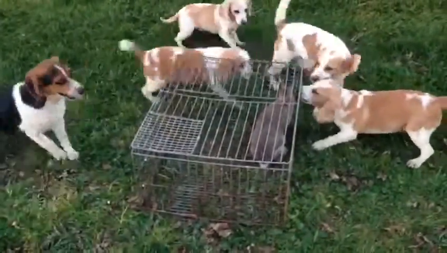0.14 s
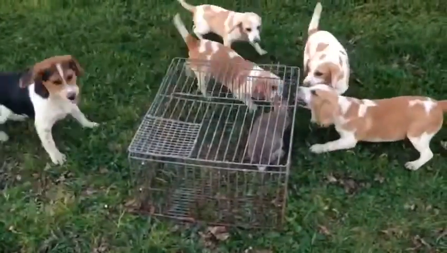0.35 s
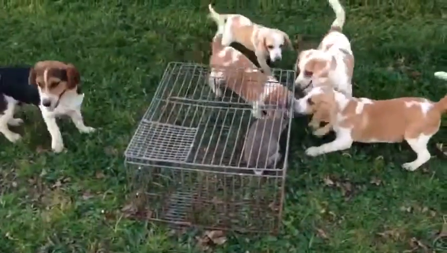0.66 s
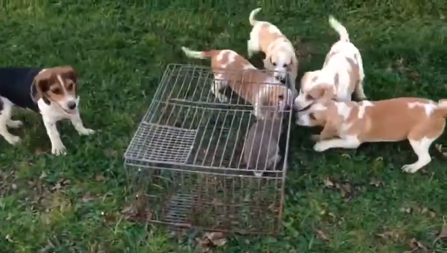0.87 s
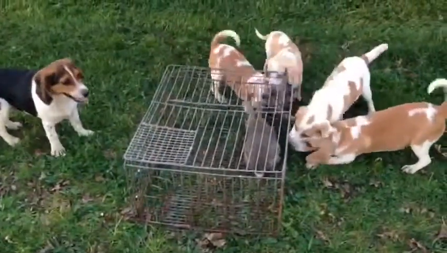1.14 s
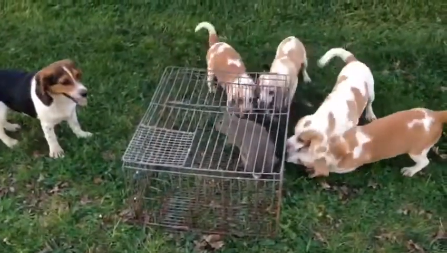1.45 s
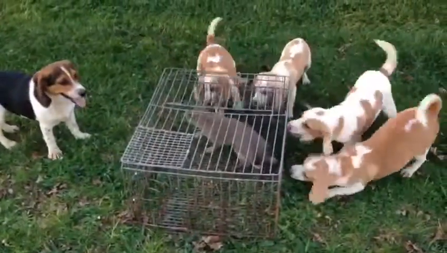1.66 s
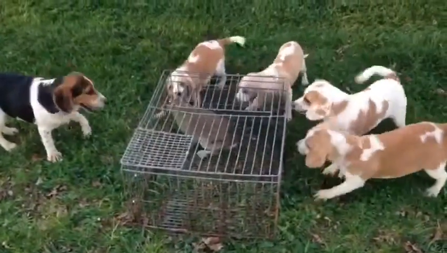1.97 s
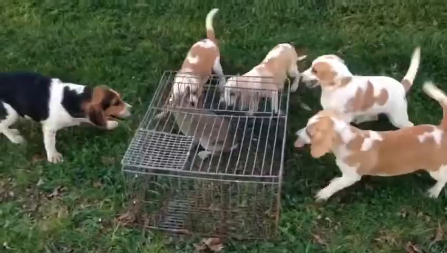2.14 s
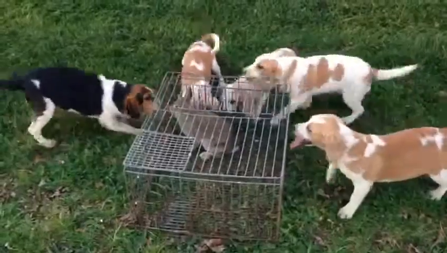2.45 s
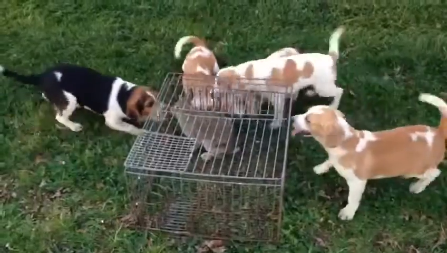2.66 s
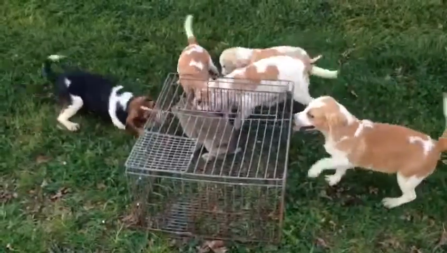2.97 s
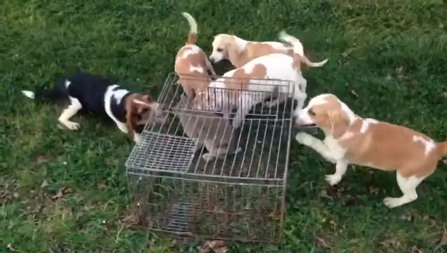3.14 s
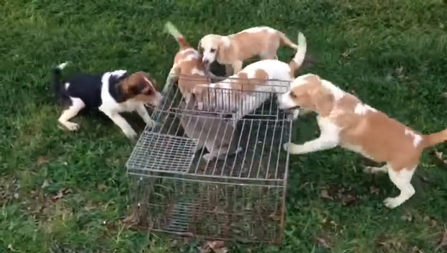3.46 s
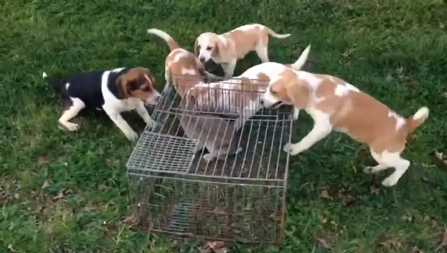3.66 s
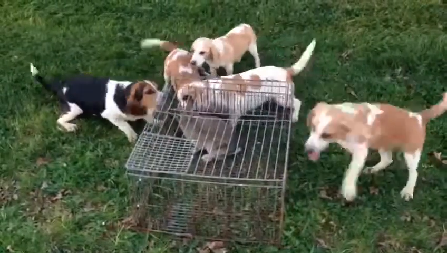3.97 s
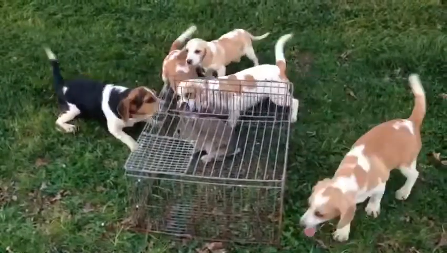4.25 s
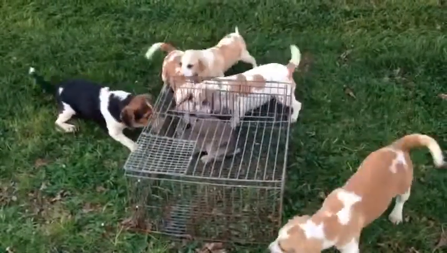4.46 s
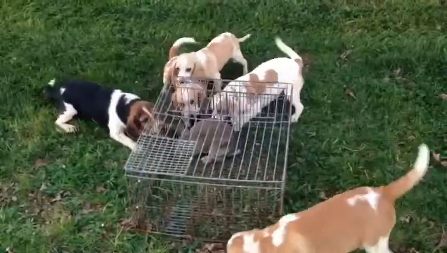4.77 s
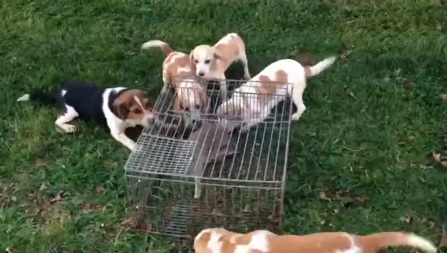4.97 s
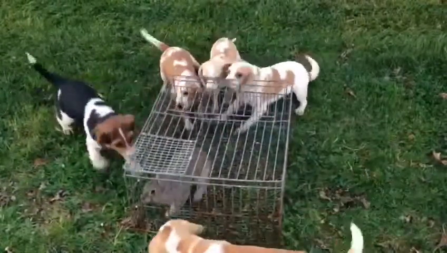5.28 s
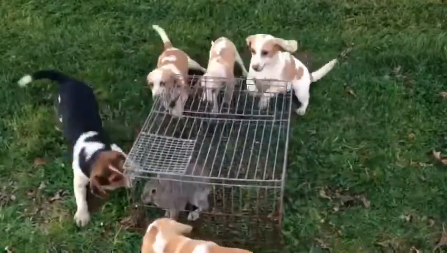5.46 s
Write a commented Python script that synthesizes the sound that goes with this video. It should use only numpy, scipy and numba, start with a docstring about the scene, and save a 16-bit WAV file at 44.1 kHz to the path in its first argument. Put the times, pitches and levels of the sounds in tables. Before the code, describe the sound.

Young dogs yelp and bay on an open lawn. A quiet opening of whimpery nose whistles and paw rustle gives way to alternating clear bays and torn, raspy barks, many opened or closed by a short falling squeak. Brief gaps hold tiny whistles. The sound is near, dry and mono, with very faint distant reflections, weak air noise and low gusts around the first two seconds.

```python
"""On a lawn, around a wire cage, excited puppies bay, bark, yip and whimper into an outdoor microphone. Bays
are clear stacks of overtones; barks are chaotic pulses ringing moving resonances. Most calls open or close with
a squeak, thin near-sine nasal whistles fill the gaps, and a thin tone rings inside one bark. Paws crackle in
the grass as grains of noise, and dull, smeared echoes return from far fences and trees. Filtered noise makes
the gusts that rumble on the microphone, a deep wavering hum and far-off air."""
import sys
import numpy as np
from scipy import signal
from scipy.fft import rfft, irfft
from scipy.io import wavfile
from scipy.ndimage import uniform_filter1d, minimum_filter1d
from numba import njit

SR = 44100
rng = np.random.default_rng(int(sys.argv[2]) if len(sys.argv) > 2 else 0)


def materialize(psi):
    """Save the field psi as 16-bit PCM at rate SR to the path in sys.argv[1].

    A 1-D psi becomes a single channel; in a 2-D psi each row is a channel.
    """
    bounded = np.clip(np.atleast_2d(psi).T, -1, 1)
    quanta = np.round(bounded * 32767).astype(np.int16)
    wavfile.write(sys.argv[1], SR, quanta)


def attenuation_scalar(level_db):
    """Turn a level in dB into a linear amplitude multiplier (20 dB per decade)."""
    decades = np.asarray(level_db, float) / 20
    return 10 ** decades


N = 247842  # length [samples]


def rms_one(x):
    """Scale to an rms of 1."""
    return x / np.sqrt(np.mean(x ** 2) + 1e-20)


def evened(x, window_s):
    """Divide by the local rms."""
    return x / np.sqrt(uniform_filter1d(x ** 2, max(int(window_s * SR), 8)) + 1e-12)


def band(x, low_hz, high_hz, order=2):
    """Keep the range between two frequencies."""
    return signal.sosfilt(signal.butter(order, [low_hz, high_hz], "band", fs=SR, output="sos"), x)


def coloured(x, spectrum):
    """Give a noise the spectrum of a table; rms 1."""
    hz, db = np.transpose(spectrum)
    grid = np.maximum(np.arange(len(x) // 2 + 1) * SR / len(x), 1)
    gain = attenuation_scalar(np.interp(np.log(grid), np.log(hz), db, left=-90, right=-90))
    return rms_one(irfft(rfft(x) * gain, len(x)))


def drift(size, rate_hz):
    """Slow chance: noise through two equal low-pass poles, rms 1."""
    r = np.exp(-2 * np.pi * rate_hz / SR)
    lead_in = 4000
    noise = rng.standard_normal(size + lead_in)
    return rms_one(signal.lfilter([1], [1, -2 * r, r * r], noise)[lead_in:])


def flicker(size, db):
    """Gain that swells and sinks at random by a spread in dB."""
    return attenuation_scalar(db * drift(size, 50))


def turning(hz, jitter):
    """Phase of a slightly unsteady oscillator."""
    return 2 * np.pi * np.cumsum(hz * (1 + jitter * drift(len(hz), 83))) / SR


@njit
def glide(x, hz, width, rate):
    """A resonance whose centre and width move."""
    y = np.zeros(len(x))
    for i in range(2, len(x)):
        r = np.exp(-np.pi * width[i] / rate)
        drive = (1 - r * r) / 2 * (x[i] - x[i - 2])
        y[i] = drive + 2 * r * np.cos(2 * np.pi * hz[i] / rate) * y[i - 1] - r * r * y[i - 2]
    return y


def ring(x, centre_hz, first_width_hz, second_width_hz):
    """Two moving resonances in series, on one centre."""
    flat = np.ones(len(x))
    once = glide(x, centre_hz, first_width_hz * flat, SR)
    return glide(once, centre_hz, second_width_hz * flat, SR)


def curve(table):
    """Draw a (time [s], level [dB]) table over the whole scene, in dB."""
    return np.interp(np.arange(N) / SR, *np.transpose(table))


def span(rows, fade_s=0.0013):
    """Sample range of one call, its fade (quick onset, softer release) and its columns per sample."""
    s, *columns = np.transpose(rows)
    at = np.arange(round(s[0] * SR), min(round(s[-1] * SR), N))
    fade = np.clip(np.minimum((at - at[0]) / (fade_s * SR), (at[-1] - at) / (0.011 * SR)), 0, 1)
    return at, fade, [np.interp(at / SR, s, c) for c in columns]


def arc(start, peak_s, length, db, rise_db, fall_db, first_hz, last_hz, arch=0):
    """Three rows (time [s], pitch [Hz], level [dB]) of a short call that swells, fades and glides."""
    share = np.clip(peak_s / length, .05, .95)
    peak_hz = (first_hz + share * (last_hz - first_hz)) * (1 + arch)
    return [(start, first_hz, db - rise_db),
            (start + share * length, peak_hz, db),
            (start + length, last_hz, db - fall_db)]


# Colour of the far-off air: (frequency [Hz], relative density [dB per Hz])
AIR_COLOUR = [(150, -8.5), (300, -6), (700, -0.5), (1400, -5), (2400, -9), (3200, -16.5), (5000, -14),
              (6500, -23), (10500, -30.5)]
# Strength of the far-off air: (time [s], level [dB])
AIR_STRENGTH = [(0, -51), (.5, -55), (1.2, -63.5), (2.8, -61), (3.6, -56.5), (4.55, -55.5), (5.62, -59)]


def far_air():
    """Faint distant air: broad noise with a tilted spectrum and a slightly unsteady level."""
    return coloured(rng.standard_normal(N), AIR_COLOUR) * attenuation_scalar(curve(AIR_STRENGTH) + 1.5 * drift(N, 8))


# Deep hum that wavers: (time [s], level [dB])
HUM_STRENGTH = [(0.0, -48), (1.11, -51), (1.77, -54), (1.92, -43), (2.22, -60.5), (2.74, -57),
                (3.13, -67.5), (3.58, -63), (3.87, -56), (4.3, -69), (5.37, -88), (5.62, -65)]


def hum():
    """A deep hum: a narrow band of low noise."""
    return rms_one(band(rng.standard_normal(N), 55, 88)) * attenuation_scalar(curve(HUM_STRENGTH))


# Gust strength on the microphone: (time [s], level of the flutter [dB])
GUSTS = [(0.0, -64), (0.32, -53), (0.52, -75), (0.68, -49.5), (0.76, -53.5), (1.04, -47), (1.18, -71),
         (1.3, -37), (1.38, -32), (1.5, -61.5), (1.78, -28), (1.88, -45), (1.91, -29), (1.96, -42.5),
         (2.36, -67), (2.4, -64.5)]
DEEP_DB, DEEP_FOLLOWS = -20, 0.74  # offset [dB] and dB per dB: the deep part rises more slowly than the flutter


def wind():
    """Wind on the microphone: low noise in lumps over a deeper rumble."""
    gust_db = curve(GUSTS)
    deep = rms_one(band(rng.standard_normal(N), 40, 96)) * attenuation_scalar(DEEP_DB + DEEP_FOLLOWS * gust_db)
    lumps = rng.standard_normal(N) * attenuation_scalar(6.2 * drift(N, 17))
    flutter = rms_one(band(lumps, 64, 190)) * attenuation_scalar(gust_db)
    return deep + flutter


# Returns from far fences and trees: (delay [s], level [dB])
RETURNS = [(.045, -35), (.11, -59), (.19, -56), (.28, -56.5), (.4, -53)]
SHIMMER_DB = 4.5  # spread of each return: moving air makes it flicker


def echoes(x):
    """A few returns from a distance, dulled by a band filter and smeared by short noise bursts."""
    dull, out = band(x, 400, 2200), np.zeros(N)
    for s, db in RETURNS:
        smear = rms_one(rng.standard_normal(2600)) * np.hanning(2600) / np.sqrt(1000)
        lag = round(s * SR)
        returned = signal.fftconvolve(dull, smear)[:N - lag]
        out[lag:] += attenuation_scalar(db) * returned * attenuation_scalar(SHIMMER_DB * drift(N - lag, 40))
    return out


# Paws in grass: (start [s], rise [s], fall [s], peak level [dB])
PAWS = [(0.01, .035, 0.077, -51.5), (0.232, 0.049, 0.056, -56.5), (3.672, 0.037, 0.035, -58.5)]
RUSTLE_RANGE_DB = 6.5  # start and end lie this far below the peak


def rustle():
    """Grass crackles in dense grains: noise with a fast random level."""
    out = np.zeros(N)
    for s, rise, fall, db in PAWS:
        edge_db = db - RUSTLE_RANGE_DB
        at, fade, (level_db,) = span([(s, edge_db), (s + rise, db), (s + rise + fall, edge_db)])
        grains = rng.standard_normal(len(at)) * attenuation_scalar(3.3 * drift(len(at), 81))
        out[at] += fade * attenuation_scalar(level_db) * rms_one(band(grains, 1000, 9500, order=1))
    return out


# Thin tones, mostly nasal whistles; the two rows near 3.3 s are a thin tone ringing inside a bark: (start [s],
# length [s], peak level [dB], first pitch [Hz], last pitch [Hz])
THIN_TONES = [(0.05, .035, -44, 4075, 4000), (0.24, 0.06, -44, 4930, 5500),
              (0.535, 0.029, -45, 5000, 5370), (0.66, 0.033, -48, 5000, 5300),
              (1.085, 0.02, -55, 5300, 5150), (1.225, 0.086, -54, 4450, 4980),
              (2.305, 0.08, -63.5, 5270, 5270), (2.352, 0.029, -54, 5140, 4300),
              (2.705, 0.031, -55.5, 5600, 4430), (2.835, 0.058, -55, 4600, 5000),
              (3.26, 0.038, -27.5, 2700, 3170), (3.295, 0.054, -28.5, 3120, 2780),
              (3.5, 0.072, -71.5, 5150, 4510), (3.595, 0.023, -61, 4280, 4320),
              (3.62, 0.053, -54.5, 5490, 5450), (3.685, 0.026, -52.5, 4114, 4280),
              (3.895, 0.061, -38.5, 5500, 6860), (4.23, 0.058, -49, 5450, 5700),
              (4.315, 0.034, -46, 5000, 5000)]
# Pinched whistles, which carry an octave: (start [s], length [s], peak level [dB], first, last pitch [Hz])
PINCHED_WHISTLES = [(0.0, 0.049, -39.5, 4640, 4720), (0.285, 0.048, -34.5, 5170, 5210),
                    (0.33, 0.06, -39.5, 5280, 4740)]
PINCHED_OCTAVE_DB = -2.5  # under the fundamental
WHISTLE_PEAK, WHISTLE_RISE_DB, WHISTLE_FALL_DB = .55, 13, 11  # peak as a share of the length
WHISTLE_ARCH = 0.015  # the pitch bulges by this share at the peak


def thin_tones(calls, octave):
    """Thin tones: a wavering near-sine and its octave, mostly air through the nose, once a thin tone inside a
    bark."""
    out = np.zeros(N)
    for s, length, db, first, last in calls:
        rows = arc(s, WHISTLE_PEAK * length, length, db, WHISTLE_RISE_DB, WHISTLE_FALL_DB,
                   first, last, WHISTLE_ARCH)
        at, fade, (hz, level_db) = span(rows)
        phase = 2 * np.pi * np.cumsum(hz * (1 + 0.0098 * drift(len(at), 90))) / SR
        out[at] += fade * np.sqrt(2) * attenuation_scalar(level_db) * (np.sin(phase) + octave * np.sin(2 * phase))
    return out


# Upper nose and mouth resonances: (centre [Hz], width of each stage [Hz], level [dB])
TREBLE_RESONANCES = [(5300, 1300, -3.5), (6980, 440, -2.5), (8070, 540, 0), (9110, 140, -2),
                     (10420, 500, -3.5)]
HISS_FOLLOWS = 0.73  # treble rises with the mouth opening, dB per dB


def treble(source):
    """Upper resonances wander as the jaw moves, each flickering on its own; rms 1."""
    size, out = len(source), 0
    jaw = drift(size, 2.5)
    for hz, width, db in TREBLE_RESONANCES:
        centre = hz * (1 + 0.034 * jaw + 0.0061 * drift(size, 5.1))
        out = out + attenuation_scalar(db + 3.1 * drift(size, 27)) * rms_one(ring(source, centre, width, width))
    return rms_one(out)


# Colour of the roughness in a clear voice: (frequency [Hz], relative density [dB per Hz])
RASP_COLOUR = [(430, -19.5), (600, 15), (1300, 10), (2400, 4.5), (3000, 0.5), (4000, -5.5), (4500, -56)]
MOUTH_WIDTH_HZ, MOUTH_STEEPNESS = 580, 2.14  # scale and exponent of the resonance curve
SKIRT_DB_PER_OVERTONE = -2.5  # slope of the overtones away from the resonances
LOCKED_MOUTH_DB = 3  # weight of the mouth curve added to the locked lines


def hump(pitch, centre):
    """Resonance curve of a mouth or nose, 1 at its centre."""
    return 1 / (1 + ((pitch - centre) / MOUTH_WIDTH_HZ) ** 2) ** MOUTH_STEEPNESS


def clear_voice(rows, locked_share, nose, jitter, skirt_db, top_hz, hiss_db, fade_s):
    """Steady vocal folds give overtones on one pitch, coloured by mouth and nose; a second vibration,
    locked four cycles to three, fills the gaps with lines a third of the pitch apart."""
    out = np.zeros(N)
    at, fade, (hz, db, open_db, mouth, rough) = span(rows, fade_s)
    size, phase = len(at), turning(hz, jitter)
    rough, lock = np.clip(rough, 0, 1), np.clip(locked_share, 0, 1)
    nose_hz, nose_db = nose

    shape = {}
    for k in range(2, 9):
        skirt = attenuation_scalar(skirt_db + SKIRT_DB_PER_OVERTONE * k)
        resonance = hump(k * hz, mouth) + attenuation_scalar(nose_db) * hump(k * hz, nose_hz)
        shape[k] = (skirt + resonance) / (1 + (k * hz / top_hz) ** 16)
    # higher overtones flicker more
    upper = sum(g * flicker(size, min(0.77 * k, 5.5)) * np.sin(k * phase + k * k) for k, g in shape.items())
    upper = upper * np.sqrt(2 / sum(g * g for g in shape.values()))

    locked = 0
    for k in [k for k in range(4, 21) if k % 3]:
        line_hz = k * hz / 3
        colour = attenuation_scalar(np.interp(line_hz, *np.transpose(RASP_COLOUR)))
        colour = colour * (1 + attenuation_scalar(LOCKED_MOUTH_DB) * hump(line_hz, mouth))
        locked = locked + colour * flicker(size, 5.7) * np.sin(k * phase / 3 + k * k)
    puffs = rng.standard_normal(size) * (1 + 1.5 * np.cos(phase))  # breath noise in step with the folds
    grit = np.sqrt(lock) * rms_one(locked) + np.sqrt(1 - lock) * coloured(puffs, RASP_COLOUR)

    fundamental = flicker(size, 0.35) * np.sqrt(2) * np.sin(phase)
    voice = fundamental + attenuation_scalar(open_db) * (np.sqrt(1 - rough) * upper + np.sqrt(rough) * grit)
    hiss = attenuation_scalar(hiss_db + HISS_FOLLOWS * open_db) * treble(puffs)
    out[at] = fade * attenuation_scalar(db) * (voice + hiss)
    return out


# Squeaks that open or close a call, or come alone:
# (start [s], length [s], peak level [dB], first pitch [Hz], last pitch [Hz])
SQUEAK_CALLS = [(0.025, 0.035, -39, 778, 865), (0.673, .048, -11, 964, 772),
                (1.265, 0.023, -18.5, 748, 794), (1.525, 0.054, -25, 707, 783),
                (2.257, 0.048, -17.5, 737, 795), (2.374, .075, 2.5, 1075, 835),
                (2.864, 0.034, -13.5, 841, 764), (3.643, 0.026, -32.5, 927, 840),
                (4.04, .045, -6, 965, 776), (4.115, 0.083, -19, 958, 883), (4.259, 0.028, -38, 1063, 957),
                (4.608, 0.033, -12.5, 927, 767), (5.069, 0.065, -14.5, 972, 826),
                (5.535, 0.042, -28.5, 752, 790)]
SQUEAK_ATTACK_S, SQUEAK_RISE_DB, SQUEAK_FALL_DB = 0.013, 41, 14
SQUEAK_KNEE, SQUEAK_KNEE_DB = 0.48, 15.5  # at this share of the attack the level is this far under the peak
SQUEAK_OPENING_DB, SQUEAK_OPENS_DB = -16, 14  # the mouth opens further as the squeak fades
SQUEAK_EFFORT = 0.17  # louder squeaks open wider, dB per dB
SQUEAK_MOUTH_HZ, SQUEAK_ROUGH = 1750, 0.067  # rough share 0-1
SQUEAK_NOSE_HZ, SQUEAK_NOSE_DB = 2690, 1.5


def squeaks():
    """A sudden rise, a falling level and a mouth that opens on the way."""
    out = 0
    for s, length, db, first, last in SQUEAK_CALLS:
        start, peak, end = arc(s, SQUEAK_ATTACK_S, length, db, SQUEAK_RISE_DB, SQUEAK_FALL_DB, first, last)
        knee_s = s + SQUEAK_KNEE * (peak[0] - s)
        knee = (knee_s, (start[1] + peak[1]) / 2, db - SQUEAK_KNEE_DB)
        rows = []
        for row in (start, knee, peak, end):
            open_db = SQUEAK_OPENING_DB + SQUEAK_EFFORT * db + SQUEAK_OPENS_DB * (row[0] - s) / length
            rows.append((*row, open_db, SQUEAK_MOUTH_HZ, SQUEAK_ROUGH))
        out = out + clear_voice(rows, 0, (SQUEAK_NOSE_HZ, SQUEAK_NOSE_DB), jitter=0.0055, skirt_db=-8.5,
                                top_hz=4000, hiss_db=-33.5, fade_s=0.001)
    return out


# Short yips, one list of rows each:
# (time [s], pitch [Hz], level of the fundamental [dB], mouth opening [dB], mouth resonance [Hz])
YIP_CALLS = [
    [(0.36, 1030, -43, 2, 3120), (0.366, 1040, -28, -18, 3120), (0.374, 1038, -16.5, -15.5, 3140),
     (0.398, 1091, -16.5, -20.5, 3150), (0.408, 1075, -14.5, -20.5, 3130), (0.426, 992, -16.5, -17.5, 3040),
     (0.455, 956, -51, -12.5, 2920)],
    [(3.92, 1036, -48, 2, 1420), (3.928, 1058, -26, -17, 1430), (3.938, 1054, -12.5, -29, 1710),
     (3.954, 1037, -16.5, -23.5, 2240), (3.988, 1128, -20.5, -13, 2320), (4.0, 1017, -16, -27, 2330),
     (4.01, 970, -22, -25, 2340), (4.02, 1047, -41, -12, 2350)],
    [(4.36, 805, -46, -17, 1420), (4.366, 782, -37, 0.5, 1420), (4.38, 689, -38.5, 10, 1440),
     (4.398, 699.6, -38, 11, 1500), (4.432, 785, -26, 12.5, 1580), (4.454, 703, -35, 7.5, 1580),
     (4.47, 731, -28.5, -14, 1550), (4.485, 705, -41, 4, 1520)],
]
# Build of each yip: (nose resonance [Hz], its level [dB], overtones away from the resonances [dB])
YIP_THROATS = [(2100, -8.5, -11.5), (5180, -2.5, 0), (2980, -10, -30)]
YIP_ROUGH = 0.01  # share 0-1


def yips():
    """Short high calls with a tight, clean voice."""
    out = 0
    for rows, (*nose, skirt_db) in zip(YIP_CALLS, YIP_THROATS):
        rows = [(*row, YIP_ROUGH) for row in rows]
        out = out + clear_voice(rows, 0, nose, jitter=0.0035, skirt_db=skirt_db, top_hz=7670,
                                hiss_db=-28, fade_s=0.00092)
    return out


# Hoarse barks, one list of rows each: (time [s], throat pitch [Hz], throat level [dB], mouth opening [dB],
# mouth resonance [Hz], muzzle resonance [Hz], lips as muzzle over mouth [dB], firm share [0-1])
BARK_CALLS = [
    [(1.56, 650, -36, 1.5, 1670, 2050, -3, 0.45), (1.576, 679.4, -22, 5.5, 1620, 2060, -8.5, 0.1),
     (1.62, 684.5, -15, 5.5, 1470, 2380, 0.5, 0), (1.65, 690, -20, 6.5, 1346, 2130, -14.5, 0.12),
     (1.808, 673, -21, 4.5, 1157, 2000, -7.5, 0.06), (1.848, 610.3, -16, -0.5, 1250, 1980, 1.5, 0.1),
     (1.9, 598.6, -18.5, -3, 1750, 1975, -0.5, 0.7), (1.94, 598, -29.5, 9.5, 1670, 1880, -5, 0.45)],
    [(2.385, 833.7, -36, 26.5, 1070, 2090, -16.5, 0.6), (2.417, 852, -12.5, 4, 990, 2115, 4, 1),
     (2.443, 787, -16.5, 4, 1510, 2240, -5, 0.7), (2.467, 693, -10.5, -5.5, 1330, 1890, 6.5, 0),
     (2.533, 725, -19, -0.5, 1086, 1840, -9, 0), (2.637, 672.4, -18, 2, 1230, 2110, -8.5, 0),
     (2.689, 720, -25.5, 8, 1346, 2186, -6.5, 0.2), (2.705, 785, -25.5, -6.5, 1390, 2130, -1, 0.45),
     (2.73, 805, -44, -9, 1400, 2210, 0, 0.5)],
    [(3.1, 635.3, -17.5, -10, 1420, 2170, -9, 0.6), (3.132, 610.2, -16, 5, 1540, 2330, -6, 0),
     (3.19, 615, -12.5, -1.5, 1420, 1910, -6.5, 1), (3.244, 613.3, -14.5, 2.5, 1270, 1870, -9, 0.72),
     (3.352, 595.4, -18.5, 5, 1317, 2260, -16.5, 0.7), (3.392, 629, -31.5, 13, 1340, 2140, -12, 0.35),
     (3.43, 685, -54, -13, 1420, 2000, 8.5, 0.45)],
    [(4.045, 837, -28, -9.5, 1360, 2620, -5, 0.6), (4.059, 829, -4.5, -2, 1640, 2540, -3.5, 0.7),
     (4.093, 775.6, -13.5, 0, 1570, 2620, -4.5, 0.4), (4.113, 739, -16.5, 5, 1490, 2550, -2, 0),
     (4.141, 798, -28.5, 13.5, 1390, 2520, -1.5, 0.1), (4.175, 813, -34, -5.5, 1440, 2540, -2, 0.6),
     (4.19, 822, -48, -25, 1410, 2470, -3.5, 0.3)],
    [(4.62, 637.6, -26.5, 0, 1530, 2580, -11, 0), (4.634, 610, -8.5, -9, 1500, 2800, 11, 0.45),
     (4.68, 613.3, -9.5, -14, 1520, 2650, 0.5, 0.52), (4.73, 614, -6.5, -17.5, 1320, 2280, -4.5, 0.66),
     (4.792, 609.2, -7, -16.5, 1300, 2250, 13.5, 0.83), (4.876, 581.4, -17.5, -2.5, 1580, 1990, 6, 0),
     (4.95, 637.5, -17, -1, 1320, 2010, -1.5, 0.2)],
    [(5.085, 742, -18.5, -4.5, 1110, 2280, -9, 0), (5.107, 660.9, -13, -7.5, 1340, 2550, -4, 0.3),
     (5.131, 644.4, -8, -13.5, 1210, 2600, 0, 0.1), (5.153, 652.8, -12, -6, 1056, 2430, 2.5, 0.45),
     (5.245, 630.4, -8, -10, 1440, 2350, 11.5, 0.8), (5.293, 650, -24, 5, 1400, 2240, -11, 0.55),
     (5.317, 617.7, -21.5, 3.5, 1350, 2170, -12, 1), (5.371, 607.7, -19, -1, 1420, 2330, -2, 0.67),
     (5.429, 750, -24.5, -4, 1750, 2330, 4, 0.3), (5.46, 684, -39.5, -10, 1740, 2060, -5, 0.5)],
]
# Build of each bark: (bite at the start [dB], treble hiss [dB])
BARK_THROATS = [(5.5, -31.5), (-4, -27.5), (-6.5, -30.5), (-0.5, -23), (1.5, -26.5), (5, -30)]
# the bite, a resonance above the mouth, rings at the start of a bark and then sinks
BITE_OVER_MOUTH, BITE_WIDTH_HZ = 1.97, 770  # ratio to the mouth resonance, width of the first stage
BITE_RISE_S, BITE_FALL_DB, BITE_S = 0.0085, 25, .07  # time constant of the swell, depth and time of the sinking
UPPER_DB = -25
TEAR_DB, TEAR_SHARE = 1.5, .025  # the resonances swell, break up and wander


def barks():
    """Chaotic folds: uneven pulses near the throat pitch ring three moving resonances;
    part of the pitch stays firm."""
    out = np.zeros(N)
    for rows, (bite_db, hiss_db) in zip(BARK_CALLS, BARK_THROATS):
        at, fade, (throat, throat_db, open_db, mouth, muzzle, muzzle_db, firm) = span(rows)
        size, firm = len(at), np.clip(firm, 0, 1)
        since_start = np.arange(size) / SR

        cycles = np.cumsum(throat * (1 + .05 * drift(size, 60))) / SR
        pulses = np.diff(np.floor(cycles), prepend=0) * attenuation_scalar(0.73 * drift(size, 140))
        # strong and weak cycles in loose threes
        pulses *= 1 + 1.5 * np.cos(2 * np.pi * cycles / 3 + 2.43 * drift(size, 24.7))
        breath = rng.standard_normal(size) * (1 + np.cos(2 * np.pi * cycles))
        source = rms_one(pulses) + .45 * breath

        loose = evened(ring(source, throat, 160, 300), 0.013)
        steady = np.sqrt(2) * np.sin(turning(throat, 0.015)) * attenuation_scalar(2.0 * drift(size, 30))
        voice = np.sqrt(firm) * steady + np.sqrt(1 - firm) * loose

        mouth = mouth * (1 + TEAR_SHARE * drift(size, 16))
        muzzle = muzzle * (1 + TEAR_SHARE * drift(size, 16))
        front = attenuation_scalar(muzzle_db) * flicker(size, TEAR_DB) * evened(ring(source, muzzle, 350, 600), 0.066)
        front -= evened(ring(source, mouth, 200, 600), 0.016)
        front /= np.hypot(1, attenuation_scalar(muzzle_db))

        sinking_db = bite_db - BITE_FALL_DB * (1 - np.exp(-since_start / BITE_S))
        swell = 1 - np.exp(-since_start / BITE_RISE_S)
        bite = evened(ring(source, BITE_OVER_MOUTH * mouth, BITE_WIDTH_HZ, 2 * BITE_WIDTH_HZ), 0.01)
        front += attenuation_scalar(sinking_db) * swell * flicker(size, TEAR_DB) * bite
        upper = evened(band(source, 2700, 4000, order=3), 0.08)
        front += attenuation_scalar(UPPER_DB) * flicker(size, TEAR_DB) * upper

        chest = attenuation_scalar(-20.0) * rms_one(band(source, 190, 690))
        voice += attenuation_scalar(open_db) * front + chest
        # a valley lies under the treble resonances
        voice = band(attenuation_scalar(throat_db) * voice, 60, 3370, order=4)
        hiss = attenuation_scalar(throat_db + hiss_db + HISS_FOLLOWS * open_db) * treble(source)
        out[at] += fade * (voice + hiss)
    return out


# Clear bays, one list of rows each: (time [s], pitch [Hz], level of the fundamental [dB],
# mouth opening as overtones over fundamental [dB], mouth resonance [Hz], rough share [0-1, clipped])
BAY_CALLS = [
    [(0.69, 585.6, -15, 4.5, 2300, 0.54), (0.708, 610, -8.5, -2.5, 2450, 0.65),
     (0.73, 617, -10.5, -8.5, 2330, 0.64), (0.84, 634.7, -12, -10.5, 2280, 0.5),
     (0.888, 613.3, -13, -8, 2190, 0.13), (0.964, 590, -14, -6.5, 1950, 0),
     (1.022, 523, -34.5, 14, 1570, 0.31), (1.06, 554, -50, -4.5, 1650, 1.1)],
    [(1.28, 494.3, -25.5, 9, 1650, 0), (1.316, 584.8, -12.5, 0.5, 1940, 0.1),
     (1.414, 620, -10, -13.5, 1510, 0.47), (1.454, 585, -11.5, -10, 1800, 0.14),
     (1.492, 557.4, -23, 5.5, 1750, 0.03), (1.522, 497.5, -27, 2, 1810, 0.13),
     (1.55, 507, -45.5, 18.5, 2000, 0.7)],
    [(1.9, 623, -13.5, 23, 1750, .6), (1.916, 548, -35.5, 10.5, 1700, .4), (1.942, 597, -23, 5, 1750, 0),
     (2.0, 566, -26.5, 8, 1940, 0.17), (2.08, 568.7, -23.5, 5.5, 1670, 0.08),
     (2.174, 546.7, -23, 4, 2080, 0), (2.222, 525, -25.5, 5, 1650, 0.04), (2.27, 497, -42.5, 19, 1480, 0.2)],
    [(2.885, 491.6, -21, 9.5, 972, 0.04), (2.919, 590, -11.5, -10, 1550, 0.35),
     (2.939, 613.4, -6.5, -15, 1250, 0.08), (3.031, 603.7, -9, -15.5, 1260, 0.39),
     (3.081, 576.5, -12, -17.5, 1800, 0.42), (3.11, 606, -30.5, 10.5, 1510, 0.8)],
    [(4.93, 662.5, -12, -1, 1480, .5), (4.954, 687, -18.5, 3.5, 1630, 0.02),
     (4.996, 659, -20.5, 5.5, 1490, 0), (5.022, 643, -29.5, 5.5, 1480, 0), (5.05, 687, -60, 25, 1400, 0)],
    [(5.17, 580, -23.5, 7, 2620, .4), (5.218, 638.2, -1, -15, 2420, 0.05), (5.282, 647, -18, -11, 1970, 0),
     (5.322, 600, -13, -3.5, 1980, 0.56), (5.388, 569.3, -26.5, 11, 1950, 0.46),
     (5.472, 592, -26.5, 8, 1770, 0), (5.516, 533.5, -37, 19, 1650, 0.01),
     (5.56, 467, -59, 35.5, 1700, 0.01)],
]
# Build of each bay: (share of the roughness that is a locked second vibration [0-1],
# nose resonance [Hz], its level [dB], treble hiss [dB])
BAY_THROATS = [(0.62, 2600, -7, -28.5), (0.8, 2240, -12, -31.5), (0.9, 1300, -11, -35.5),
               (0.9, 3010, -15, -38.5), (.6, 1700, -3, -33.5), (0.7, 2920, -15, -29.5)]


def bays():
    """Long clear calls: steady overtones, roughened by the locked second vibration."""
    out = 0
    for rows, (lock, *nose, hiss_db) in zip(BAY_CALLS, BAY_THROATS):
        out = out + clear_voice(rows, lock, nose, jitter=0.0055, skirt_db=-15.5, top_hz=4210,
                                hiss_db=hiss_db, fade_s=0.019)
    return out


def scene():
    """The open air, the small sounds and the pack with its echoes, on one microphone."""
    air = far_air() + hum() + wind()
    tones = thin_tones(THIN_TONES, octave=0) + thin_tones(PINCHED_WHISTLES, octave=attenuation_scalar(PINCHED_OCTAVE_DB))
    pack = squeaks() + yips() + barks() + bays()
    # small throats radiate little below their pitch
    small = band(pack, 397, 16000, order=3) + attenuation_scalar(-11.5) * band(pack, 140, 230, order=3)
    return (air + echoes(small) + rustle() + tones + small)[None]


def band_limit(x):
    """A steep low-pass at the top of the band."""
    return signal.sosfilt(signal.butter(12, 11010, fs=SR, output="sos"), x)


def record(dry):
    """The top of the microphone signal is cut; a fast limiter holds the peaks under the ceiling."""
    cut = signal.sosfilt(signal.cheby2(10, 50, 11400, fs=SR, output="sos"), dry)  # stopband from 11400 Hz
    room = minimum_filter1d(np.minimum(1, .98 / (np.abs(cut) + 1e-9)), size=441)
    mix = cut * uniform_filter1d(room, size=221)
    return band_limit(mix)


dry = scene()
out = record(dry)
materialize(out)
```